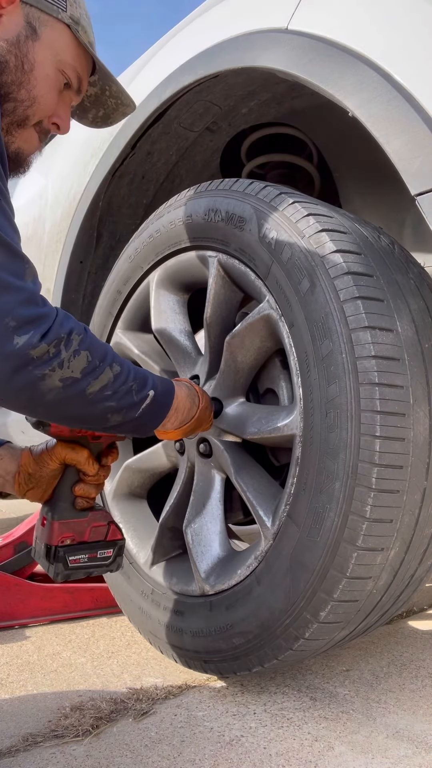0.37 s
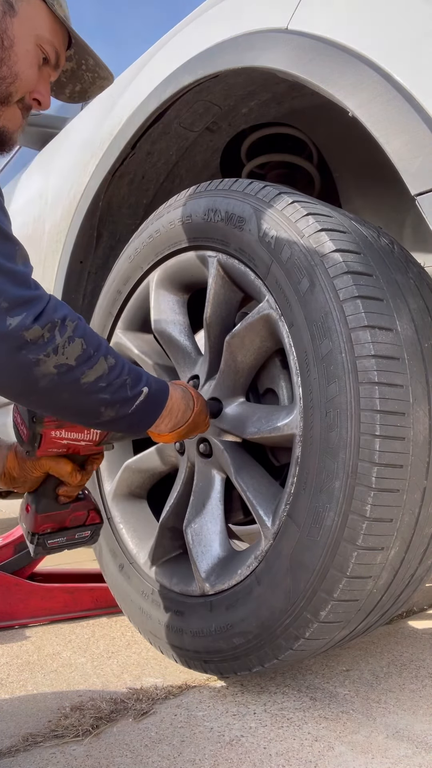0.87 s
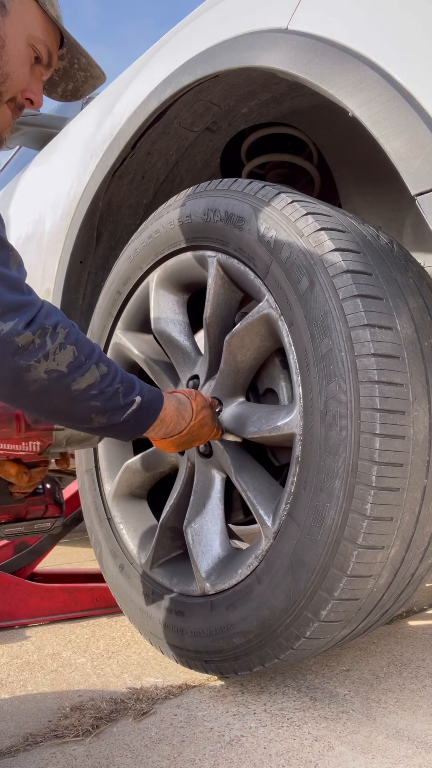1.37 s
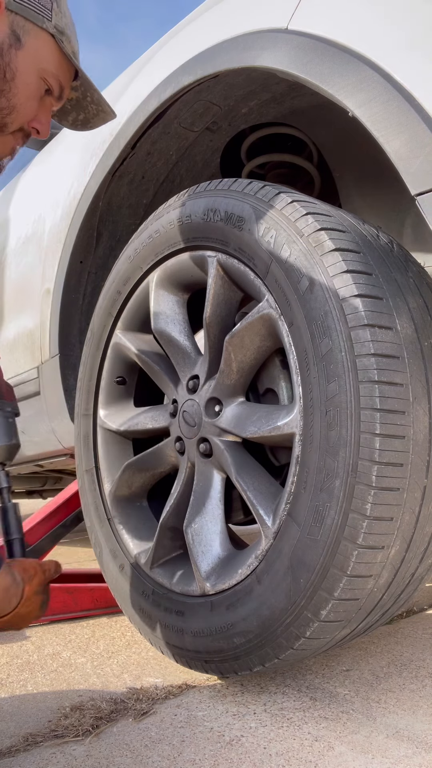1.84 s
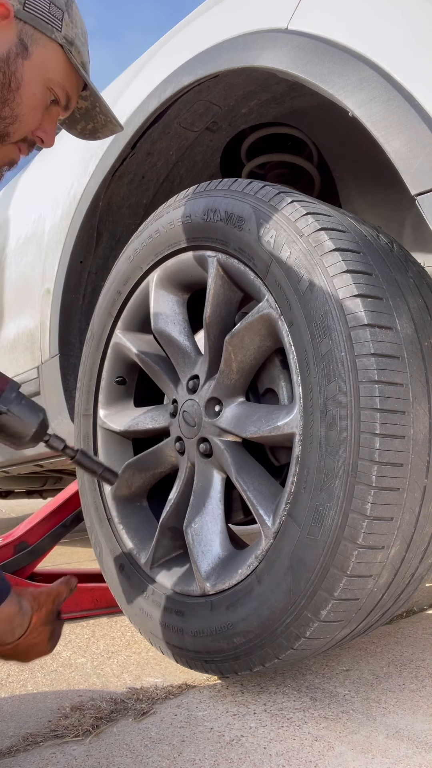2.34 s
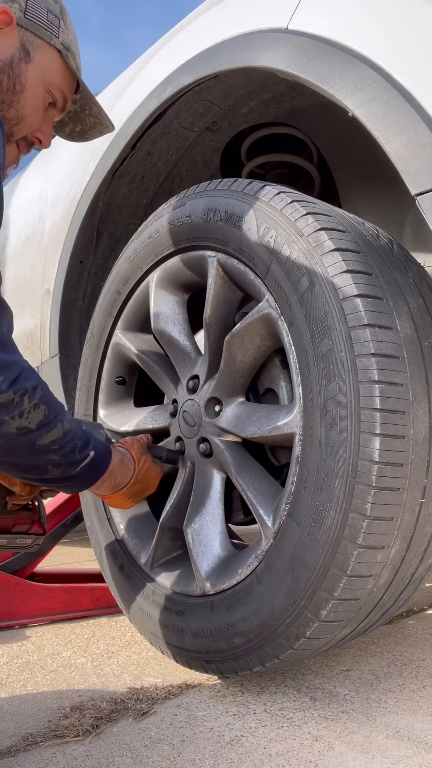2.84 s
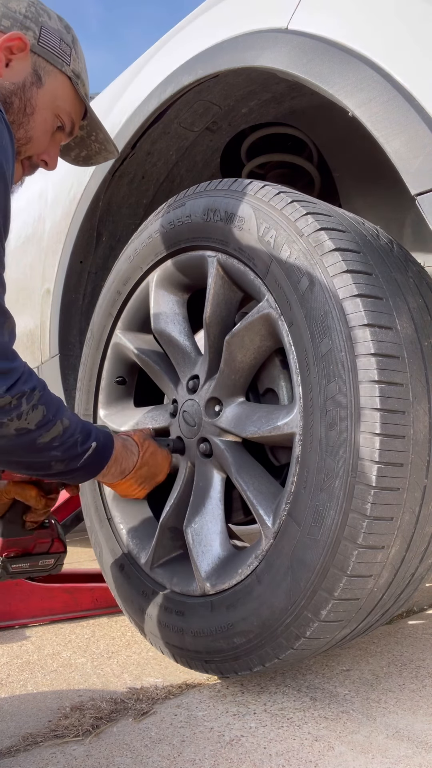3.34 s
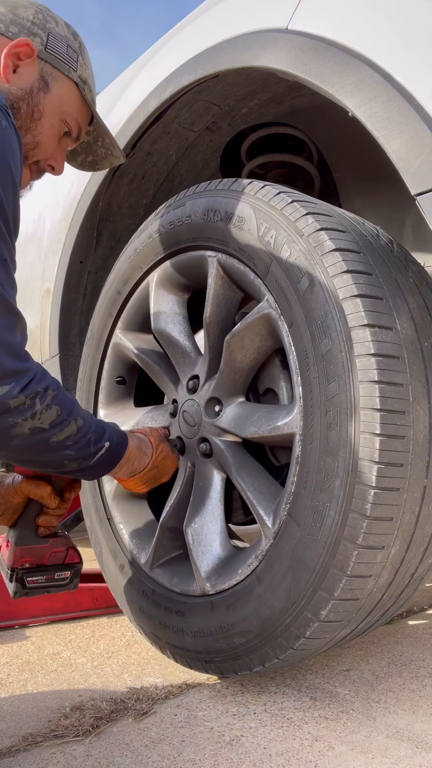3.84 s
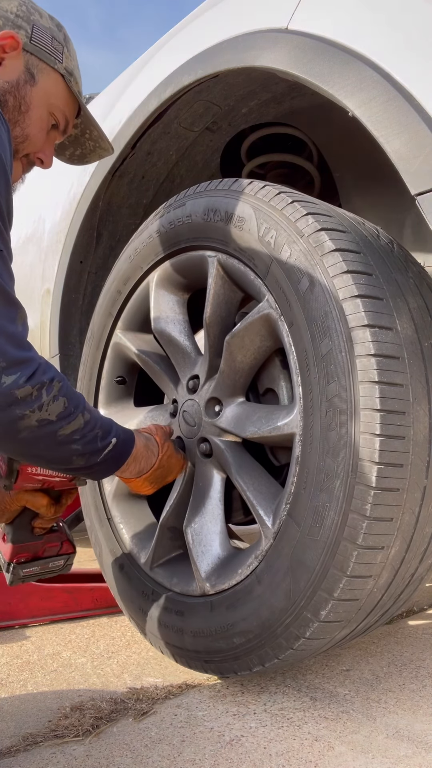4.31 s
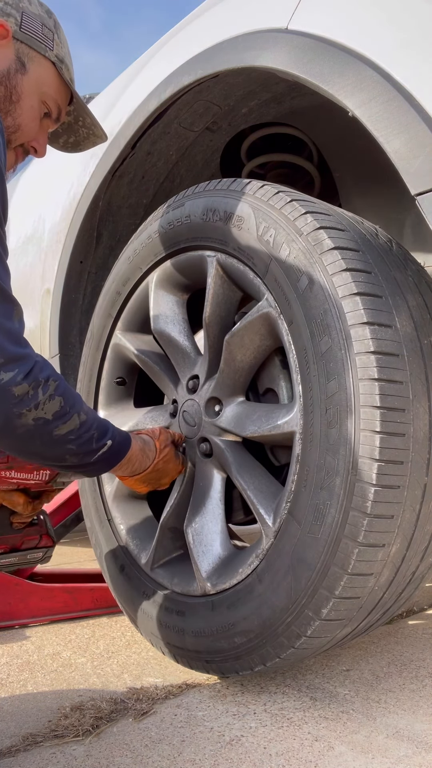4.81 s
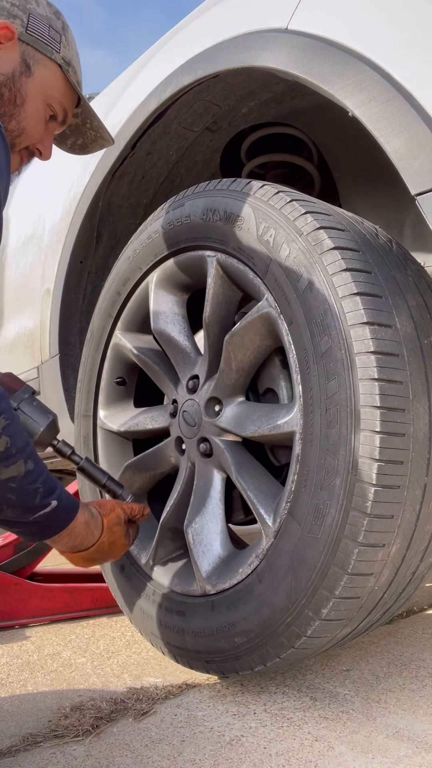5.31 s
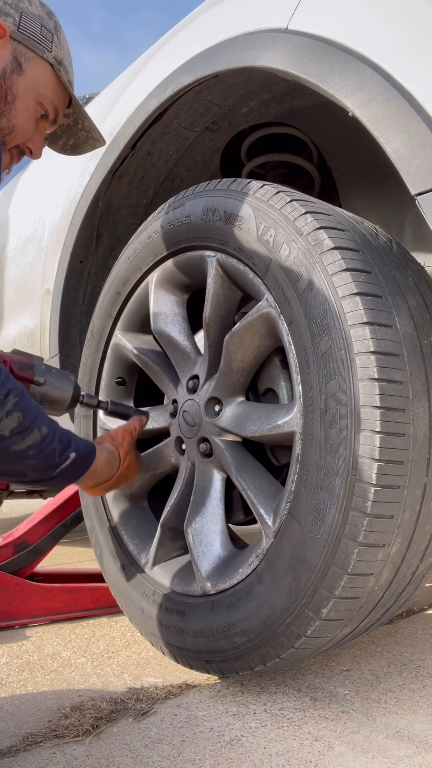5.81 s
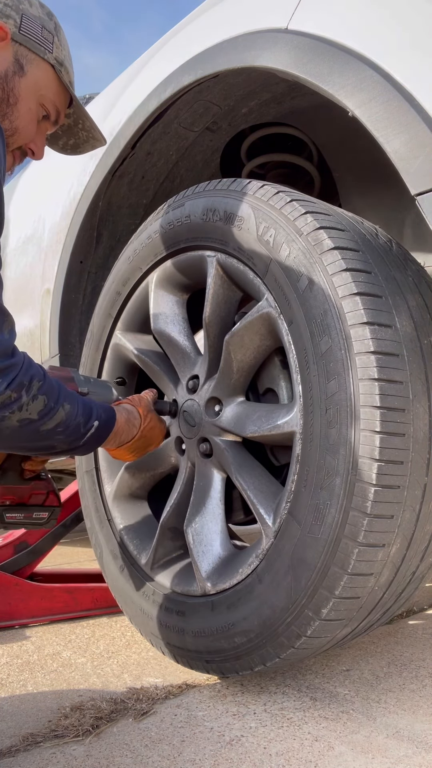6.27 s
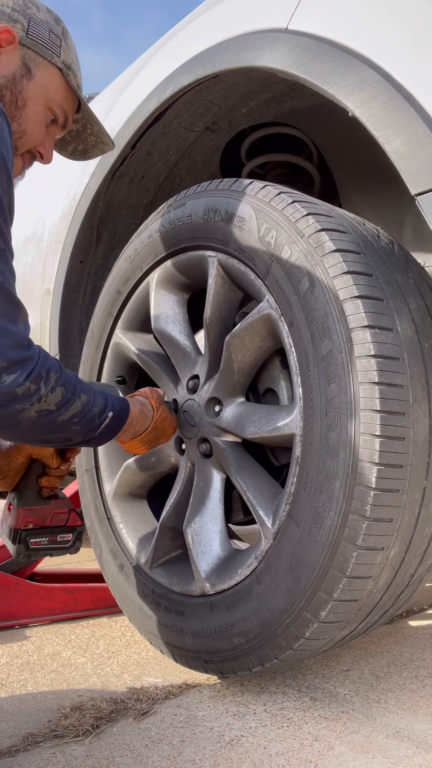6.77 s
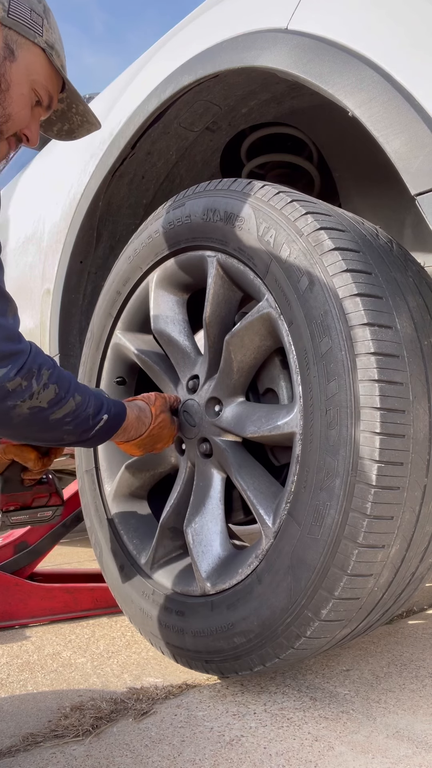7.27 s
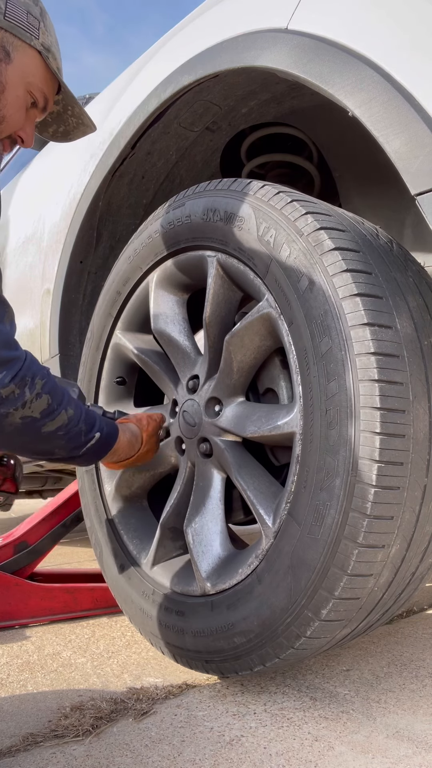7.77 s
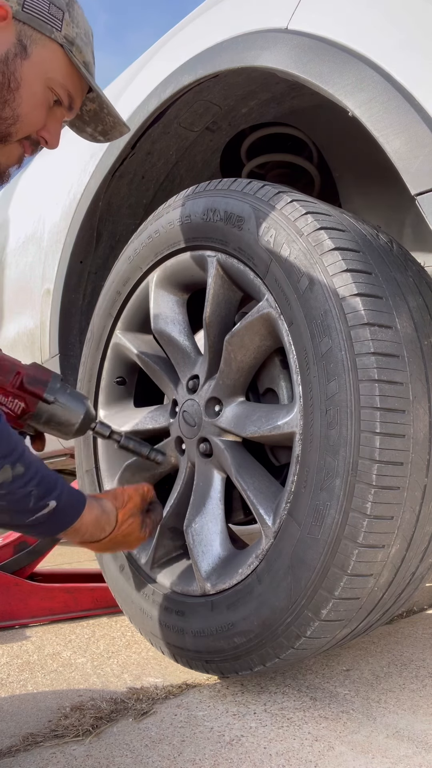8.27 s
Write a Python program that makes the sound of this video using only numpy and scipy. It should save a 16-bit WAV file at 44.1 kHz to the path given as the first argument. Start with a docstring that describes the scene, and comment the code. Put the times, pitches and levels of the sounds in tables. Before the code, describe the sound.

A cordless impact wrench hammers loose three wheel nuts in turn outdoors, each burst followed by a whirring free spin and quick braking stop.

```python
"""A cordless impact wrench undoes three wheel nuts outdoors, a step from a phone with two microphone ports.
Hammer blows, some 36 a second, are grainy noise bursts with ringing steel and a hum of the tyre's air. Motor
tones are multiples of one shaft's turning, through wind-up, free run and brake; filtered noise is fan, gears,
housing and the rattling nut, falling sweeps are low whoomps. Socket, nut and wheel clink as bursts and modes;
behind them shaped noise gives distant traffic and wind, gloves and a dragged socket, with a far thin tone."""
import sys
import numpy as np
from scipy import signal
from scipy.fft import rfft, irfft, next_fast_len
from scipy.io import wavfile
from scipy.ndimage import uniform_filter1d

SR = 44100
rng = np.random.default_rng(int(sys.argv[2]) if len(sys.argv) > 2 else 0)


def linear_from_db(decibels):
    """Turn decibels (scalar or array-like) into linear amplitude factors; 0 gives 1."""
    return 10 ** (np.asarray(decibels, float) / 20)


def output_pcm(signal):
    """Save a mono or channel-first signal as 16-bit PCM at the path in sys.argv[1].

    Samples are clipped to [-1, 1] before scaling.
    """
    pcm = np.clip(np.atleast_2d(signal).T, -1, 1) * 32767
    wavfile.write(sys.argv[1], SR, np.round(pcm).astype(np.int16))


N = 380583
T = np.arange(N) / SR

# Distant traffic and wind. Each row: time in seconds, level in dB.
RUMBLE_LEVEL = [(0.0, -65.5), (1.58, -72), (2.31, -71), (2.52, -65), (2.91, -62), (3.75, -61.5),
                (4.93, -69), (5.79, -65), (6.49, -58), (7.3, -58.5), (7.79, -64.5), (8.63, -65)]
# Its spectrum. Each row: frequency in Hz, relative density in dB per Hz.
RUMBLE_SPECTRUM = [(18, -36.5), (30, -12.5), (75, 4), (144, 0), (297, -8.5), (562, -11), (805, -19),
                   (903, -21.5), (1170, -37.5), (1500, -31), (1950, -59.5), (3300, -120)]
# Bass swelling under the hammering. Each row: peak in seconds, level in dB, fade in dB per second.
SHUDDERS = [(0.1, -33.5, 43.5), (0.24, -37, 46), (3.85, -51.5, 30.5), (4.02, -50.5, 33.5), (6.69, -35, 206),
            (6.751, -52, 42)]
SHUDDER_RISE_DB_S = 199.5
# A faint rising tone far off. Each row: time in seconds, frequency in Hz, level in dB.
FAR_WHINE = [(1.6, 1440, -100), (1.8, 1460, -101.5), (2.8, 1568, -81), (3.101, 1590, -100)]
# Gloves and sleeves close by. Each row: peak in seconds, level in dB, spread in seconds.
RUSTLES = [(1.5, -83.5, .25), (2.3, -87, 0.14), (2.62, -76, 0.14), (3.35, -81, .17), (5.17, -76.5, .15),
           (6.28, -77, .12), (7.86, -86.5, .2), (8.63, -80.5, .08)]
RUSTLE_FLOOR_DB = -88.5
# Spectrum of the cloth. Each row: frequency in Hz, relative density in dB per Hz.
CLOTH_SPECTRUM = [(700, -3.5), (1500, -1.5), (3000, -4), (5000, -9), (8000, -10), (12000, -9.5),
                  (15800, -10)]
# Socket dragged over the wheel. Each row: start in seconds, length in seconds, level in dB.
RUBS = [(2.644, 0.44, -73.5), (3.111, 0.29, -67.5)]
# Spectrum of the drag. Each row: frequency in Hz, relative density in dB per Hz.
RUB_SPECTRUM = [(450, -12), (600, -2), (750, -13), (1500, -11), (1750, -3), (1850, 8), (1950, -10),
                (2300, -27), (3000, -29), (3600, -17), (4300, -38)]

# Socket, nut and wheel touch. Each row: start in seconds, relative level in dB, treble tilt in dB per
# octave, scuff decay t60 in seconds.
CLINKS = [(1.5064, -31, -1, 0.067), (1.975, -52, -8, 0.067), (2.2662, -55, -5, 0.071),
          (2.4819, -52, 8, 0.084), (2.6104, -50, -7, 0.055), (2.6412, -32, -5.5, 0.038),
          (3.0488, -60, -0.5, 0.04), (3.1016, -24, -9, 0.019), (3.2037, -29.5, -6, 0.032),
          (3.286, -40.5, -9.5, 0.053), (3.3363, -58, -11, 0.052), (3.358, -35.5, -10, 0.049),
          (3.422, -48.5, -7.5, 0.093), (3.437, -47, -4, 0.05), (5.098, -33, 0.5, 0.052),
          (5.1485, -33, -2, 0.039), (5.6374, -48, -4, 0.058), (5.6573, -51, -7, 0.065),
          (5.9364, -39, -12, 0.12), (5.942, -26.5, -8.5, 0.068), (5.9492, -19.5, -8, 0.037),
          (6.15, -52, -19, 0.05), (6.1937, -40.5, -7, 0.22), (6.2253, -27, -6.5, 0.083),
          (6.2822, -30, -4, 0.036), (6.3795, -28, -7.5, 0.051), (6.439, -52, 5.5, 0.06),
          (6.4958, -29, -1.5, 0.066), (7.878, -33.5, -3, 0.042), (8.02, -52, -4.5, 0.056),
          (8.088, -58, -4, 0.04), (8.1333, -33, 0.5, 0.066), (8.1566, -63, -10, 0.06),
          (8.207, -50.5, 0, 0.054), (8.289, -62, -3, 0.038), (8.4585, -40, -8, 0.1),
          (8.4732, -25, -7, 0.026), (8.5023, -38.5, -7, 0.07)]
# Modes of the wheel. Each row: nominal frequency in Hz, relative level in dB, t60 in seconds.
WHEEL_MODES = [(646, -9, .5), (883, -7, .14), (991, -4, .15), (1250, -5, .06), (1350, -4, .12),
               (1464, -9, .28), (1660, -4, .05), (1836, -11, .4), (2040, -3, .16), (2250, -5, .05),
               (2482, -17, .15), (2800, -6, .05), (3650, -22, .3)]
WHEEL_RING_DB = -33.5
# The socket's thin ring. Each row: start in seconds, low tone in dB, high tone in dB, factor on the decay t60.
SOCKET_RINGS = [(1.973, -64, -63.5, 1.33), (2.641, -57, -45, 0.15), (3.204, -85, -73, .6),
                (5.099, -60, -76, 0.83), (5.949, -83, -72.5, 0.43), (6.205, -85, -51, 0.17),
                (8.021, -68.5, -52, 0.99), (8.134, -80, -63, 0.37)]
# Low socket tone. Each row: nominal frequency in Hz, relative level in dB, t60 in seconds ahead of the factor.
SOCKET_LOW = [(9790, 0, .55), (9717, -10, .3)]
# High socket tone. Each row: nominal frequency in Hz, relative level in dB, t60 in seconds ahead of the factor.
SOCKET_HIGH = [(12620, 0, .55), (12520, -10, .25)]

# Low whoomps. Each row: start in seconds, relative level in dB, fade in seconds, sharpness of the start.
WHOOMPS = [(0.045, -26, .04, 1), (0.077, -15.5, .02, 1), (.155, -23.5, .015, 1), (0.2798, -17, 0.028, 0.95),
           (0.308, -19.5, 0.02, 0.8), (0.338, -15.5, 0.045, 0.4), (.44, -31.5, 0.025, 0.2),
           (0.484, -33, .03, 0.3), (0.561, -5, 0.016, 1.2), (.66, -28, 0.026, 0.02),
           (0.707, -31, 0.03, 0.16), (3.80, -34.5, 0.066, 0.19), (3.862, -14, 0.041, .6),
           (3.8931, -10, 0.033, 0.45), (4.006, -14.5, 0.025, 0.57), (4.063, -27.5, 0.052, .2),
           (6.668, -25, 0.017, 0.54), (6.836, -27.5, 0.015, 0.64), (6.967, -34, 0.038, 0.07)]

# Free spinning up to the brake, one list a run. Each row: time in seconds, gear mesh in Hz, relative level
# in dB of its 1st harmonic, of its 2nd, and of the fan and gearbox noise.
SPIN_RUNS = [
    [(0.575, 3400, -70, -69.5, -46.5), (0.605, 3483, -47.5, -62, -41.5), (0.623, 3790, -42.5, -59, -41),
     (0.647, 3687, -39.5, -63, -37.5), (0.827, 3905, -41, -35, -36), (1.045, 3923, -54.5, -34.5, -39),
     (1.249, 3979, -41.5, -36.5, -41), (1.312, 3770, -50, -42.5, -36.5)],
    [(4.14, 3600, -59, -84, -43), (4.25, 3852, -44, -48.5, -39.5), (4.416, 3953, -41.5, -39, -41.5),
     (4.714, 3971, -48, -37, -41.5), (4.878, 3996, -44.5, -37.5, -40.5), (4.956, 3785, -53, -50, -38.5)],
    [(6.85, 3700, -71, -75, -43.5), (6.906, 3753, -49, -51, -38.5), (6.98, 3816, -44, -40, -39),
     (7.19, 3950, -40, -65, -41.5), (7.406, 3980, -37.5, -40.5, -43), (7.598, 3980, -40.5, -35.5, -39.5),
     (7.69, 3800, -70, -52, -38.5)],
]
PINION_TEETH = 13
# 3rd mesh harmonic in free running, on the scale of SPIN_RUNS: least level, and level against the 2nd
THIRD_DB, THIRD_BELOW_DB = -58, -13
# Pole hum of the motor. Each row: multiple of shaft rate, relative level in dB.
POLE_ORDERS = [(4, -8), (5, -12), (8, 0), (12, -17), (20, -14), (36, -3)]
HUM_DB, HUM_RISE_DB_S, HUM_TOP_DB = -63.5, 24.5, -50  # pole hum grows as the nut runs out
# Housing resonances. Each row: frequency in Hz, width in Hz, lift in dB.
HOUSING = [(2720, 290, 18), (2125, 55, 6.5)]
# Motor tones under the brake. Each row: multiple of shaft rate, relative level in dB.
BRAKE_ORDERS = [(4, -49.5), (8, -47.5), (13, -53), (16, -52.5), (19, -50), (22, -57)]
# Nut rattle, release tone, brake glides and stop growl. Each entry: relative level in dB for one run.
RUN_DB = [0, -3.5, -3]
# Mesh rate falls gently during the bite, then faster
BITE_HZ_S, BITE_S, BRAKE_HZ_S, BRAKE_S = 11520, .035, 17800, .15
BRAKE_FADE_DB_S, BRAKE_WOBBLE = 397, .012
BRAKE_FLUTTER_DB = 8  # random level flutter breaks up the glides
BITE_ORDER, BITE_DB, BITE_FADE = 8, -38.5, 0.23  # fade as a share of the braking
RELEASE_S, RELEASE_ORDER, RELEASE_DB = 0.051, 9.94, -48.5  # trigger let go ahead of the brake

# Spectrum of fan and gears. Each row: frequency in Hz, relative density in dB per Hz.
GEAR_SPECTRUM = [(150, -23), (400, -11.5), (800, -7), (1300, -1.5), (1900, 0), (2500, -1.5), (3300, -6),
                 (4300, -8.5), (5500, -5), (7000, -9), (9000, -12), (11000, -12.5), (14000, -15),
                 (16300, -22)]
# Motor under load while hammering. Each row: start in seconds, end in seconds.
HAMMERING = [(0.0, 0.572), (3.9, 4.18), (6.648, 6.88)]
LOAD_DB, LOAD_TREBLE_DB = -38, -48
TREBLE_SAG_DB_S, TREBLE_RISE_S = 8, .04
WHIR_SPEED_POWER, TREBLE_SPEED_POWER, COAST_DB_S = 3.9, 2.3, 450.5
# Motor winds up against the hammer spring. Each row: start in seconds, first catch in seconds, level in dB
# at the catch of gear noise, of housing growl and of controller whine.
WIND_UPS = [(-0.06, 0.033, -25.5, -28.5, -34), (0.031, 0.14, -27, -29.5, -40.5),
            (3.735, 3.834, -20.5, -26, -50.5), (6.478, 6.58, -22.5, -35, -48.5)]
WIND_GEAR_RISE_DB, WIND_GROWL_RISE_DB, WIND_WHINE_RISE_DB, WIND_FADE_DB_S = 63.5, 31, 8, 700.5
WHINE_HZ = 7700
# Spectrum of the growling housing. Each row: frequency in Hz, relative density in dB per Hz.
GROWL_SPECTRUM = [(2200, -23), (2550, -3), (2700, 1), (2850, -7.5), (3200, -19.5)]
STOP_GROWL_DB, STOP_FADE_DB_S = -61.5, 130  # the housing rings on after the stop
# Rattle of the nut running along the stud thread. Each row: frequency in Hz, relative density in dB per Hz.
DRONE_SPECTRUM = [(1050, -28), (1200, -1.5), (1450, 0), (1650, -10)]
DRONE_DB, DRONE_RISE_S = -43.5, 0.076

# Hammer on anvil. Each row: start in seconds, relative level in dB, rattle decay t60 in seconds.
BLOWS = [(0.0302, 1.5, 0.035), (0.0726, -22, 0.071), (0.1076, -25, 0.057), (0.142, -9, 0.024),
         (0.1519, 1, 0.048), (0.179, -0.5, 0.04), (0.191, -6.5, 0.064), (0.2464, 0, 0.037),
         (0.271, -3.5, 0.049), (0.278, -7, 0.056), (0.3091, 2.5, 0.021), (0.337, -0.5, 0.034),
         (0.3646, -1, 0.031), (0.393, 0.5, 0.03), (0.4209, 0, 0.023), (0.4472, -3, 0.04),
         (0.4748, -6, 0.044), (0.5016, 0.5, 0.022), (0.5307, -3.5, 0.034), (0.5584, -6, 0.014),
         (0.609, -30, 0.06), (3.7547, -40.5, 0.05), (3.7778, -23, 0.042), (3.798, -23, 0.017),
         (3.8101, -16.5, 0.05), (3.8192, -1.5, 0.046), (3.8321, -4.5, 0.079), (3.862, -1.5, 0.073),
         (3.8923, -2, 0.035), (3.9223, 1, 0.021), (3.9505, -2.5, 0.035), (3.9783, 1.5, 0.019),
         (4.0051, -7, 0.081), (4.0326, -1.5, 0.032), (4.0601, -2.5, 0.042), (4.0875, -5.5, 0.047),
         (4.1169, -3.5, 0.035), (4.1946, -12.5, 0.022), (4.2379, -15.5, 0.08), (6.535, -19.5, 0.067),
         (6.568, -8.5, 0.028), (6.5775, -7.5, 0.1), (6.6066, -5, 0.094), (6.6372, 2.5, 0.024),
         (6.6654, 1.5, 0.023), (6.6935, -11, 0.18), (6.7206, -4, 0.05), (6.747, -10, 0.11),
         (6.7747, 0, 0.028), (6.8027, -6.5, 0.076), (6.8323, -1.5, 0.026), (6.8692, -12.5, 0.056),
         (6.9158, -16, 0.043)]
# Spectrum of rattles and scuffs ahead of tilt. Each row: frequency in Hz, relative density in dB per Hz.
BLOW_SPECTRUM = [(150, -12.5), (400, -6.5), (800, -15.5), (1300, -3.5), (2000, 0.5), (3200, -4),
                 (4200, -2.5), (5500, 7), (7000, 0), (9000, -2.5), (11000, -4.5), (14000, -4),
                 (16500, -15.5)]
GRAIN_DB, COLOUR_SCATTER_DB, TILT_DB, TILT_SCATTER_DB = 3.5, 3.2, 0.15, 2  # tilt is per octave
# Modes of the anvil. Each row: nominal frequency in Hz, relative level in dB, t60 in seconds.
ANVIL_MODES = [(1366, -13, 0.082), (1916, -13.5, 0.039), (2070, -19.5, 0.014), (2650, -5.5, 0.051),
               (3215, 4, 0.019), (3890, 3.5, 0.026), (6060, -0.5, 0.075), (6100, -8.5, 0.038),
               (7570, -9.5, 0.021), (13500, -8.5, .02)]
ANVIL_SCATTER_DB = 4
# Modes of its tip. Each row: nominal frequency in Hz, relative level in dB, t60 in seconds.
TIP_MODES = [(9800, -1.5, 0.075), (9400, -3, .04)]
TIP_DB, TIP_SCATTER_DB, TIP_GAIN_DB_S = -33, 4, 2.45  # the tip rings more from nut to nut
TYRE_AIR_HZ, TYRE_AIR_DB, TYRE_AIR_T60_S = 187.2, -64.5, 2.4

# Phase between the microphone ports. Each row: frequency in Hz, lead of the left port in radians.
PORT_LEAD = [(0, 0), (2240, .15), (2600, .5), (3100, .15), (4050, .2), (4400, .8), (4750, 2.9), (5450, 3.5),
             (5800, 3.9), (7240, 4.1), (9900, 5.2), (10600, 5.8), (11900, 6.1), (16500, 6.4)]
LEFT_DB = .2  # left port up, right port down by this much
ECHO_DB, ECHO_SIDE_DB, ECHO_T60_S = -12.5, -12, 0.065
TOP_HZ = 16500


def unit(x):
    """Scale to rms 1."""
    return x / np.sqrt(np.mean(x ** 2))


def colour(x, points):
    """Shape a spectrum by (Hz, dB) points; it falls away outside them."""
    hz, db = np.transpose(points)
    size = next_fast_len(x.shape[-1])
    f = np.fft.rfftfreq(size, 1 / SR) + 1
    edge = np.minimum(f / hz[0], 1) ** 2 * np.minimum(hz[-1] / f, 1) ** 2
    gain = linear_from_db(np.interp(np.log(f), np.log(hz), db)) * edge
    return irfft(rfft(x, size) * gain, size)[..., :x.shape[-1]]


def shaped_noise(points):
    """Steady noise of rms 1 with the given spectrum."""
    return unit(colour(rng.standard_normal(N), points))


def curves(tables, off):
    """Columns over time; between the tables they rest at the value off."""
    rows = []
    for table in tables:
        rows += [(table[0][0] - .004, *off), *table, (table[-1][0] + .004, *off)]
    s, *columns = np.transpose(rows)
    return [np.interp(T, s, column) for column in columns]


def walk(rate):
    """Random levels held 1 / rate s and slewed; spread near 1."""
    k = int(SR / rate)
    held = np.repeat(rng.standard_normal(N // k + 1), k)
    return 0.95 * uniform_filter1d(uniform_filter1d(held, k), k)[:N]


def peak(s, db, rise_db_s, fall_db_s):
    """A level that climbs to db at time s and sinks after it."""
    return db - np.where(T < s, rise_db_s * (s - T), fall_db_s * (T - s))


def add(out, s, sound):
    """Mix a sound in at time s."""
    i = int(s * SR)
    out[i:i + len(sound)] += sound[:N - i]


def sine(hz):
    """A tone that follows a frequency over time."""
    return np.sin(2 * np.pi * np.cumsum(hz) / SR)


def ring(modes, t, scatter_db, detune):
    """Decaying modes; each contact point excites them differently."""
    hz, db, t60 = np.transpose(modes)[:, :, None]
    level, pitch, phase = rng.standard_normal((3, len(modes), 1))
    decay = linear_from_db(db + scatter_db * level - 60 * t / t60)
    return np.sum(decay * np.sin(2 * np.pi * hz * (1 + detune * pitch) * t + phase), 0)


def burst(t, tilt_db, t60, rise_s, grain_db):
    """Many parts rattle at once: grainy noise with a crack near the front, each with its own colour."""
    points = []
    for hz, db in BLOW_SPECTRUM:
        tilt = tilt_db * np.log2(max(hz, 800) / 4000)
        points.append((hz, db + tilt + COLOUR_SCATTER_DB * rng.standard_normal()))
    noise = rng.standard_normal(len(t))
    grain = np.repeat(rng.standard_normal(len(t) // 24 + 1), 24)[:len(t)]
    rattle = unit(colour(noise * linear_from_db(grain_db * grain), points))
    crack = 1 + 1.5 * np.exp(-t / 0.0031)
    rise = 1 - np.exp(-(t / rise_s) ** 2)
    return rattle * rise * crack * linear_from_db(-60 * t / np.clip(t60, .008, .3))


def rumble():
    """Distant traffic and wind: wavering low noise, with the bass swelling under the hammering."""
    s, db = np.transpose(RUMBLE_LEVEL)
    gain = linear_from_db(np.interp(T, s, db))
    for s, db, fade in SHUDDERS:
        gain += linear_from_db(peak(s, db, SHUDDER_RISE_DB_S, fade))
    return gain * linear_from_db(1.9 * walk(9)) * shaped_noise(RUMBLE_SPECTRUM)


def far_whine():
    """A faint tone far off, gliding upward."""
    s, hz, db = np.transpose(FAR_WHINE)
    return linear_from_db(np.interp(T, s, db)) * sine(np.interp(T, s, hz))


def rustle():
    """Gloves and sleeves: fluttering cloth noise that swells over a faint floor."""
    gain = linear_from_db(RUSTLE_FLOOR_DB)
    for s, db, spread in RUSTLES:
        gain = gain + linear_from_db(db) * np.exp(-((T - s) / spread) ** 2)
    return gain * linear_from_db(3.7 * walk(45) + 2.4 * walk(9)) * shaped_noise(CLOTH_SPECTRUM)


def rub():
    """The socket dragged over the wheel: uneven friction noise that dwindles."""
    gain = np.zeros(N)
    for s, length, db in RUBS:
        gain += linear_from_db(db) * np.sqrt(np.clip(1 - (T - s) / length, 0, 1)) * (T > s)
    return gain * linear_from_db(3 * walk(40)) * shaped_noise(RUB_SPECTRUM)


def clinks():
    """Light touches: a dry scuff with a faint ring of the wheel."""
    out, t = np.zeros(N), T[:int(.4 * SR)]
    for s, db, tilt_db, t60 in CLINKS:
        # the wheel's ring flutters randomly in level
        flutter_db = 6 * np.repeat(rng.standard_normal(len(t) // 200 + 1), 200)[:len(t)]
        rim = ring(WHEEL_MODES, t, 3, .004) * linear_from_db(uniform_filter1d(flutter_db, 150))
        scuff = burst(t, tilt_db, t60, 0.0016, GRAIN_DB)
        add(out, s, linear_from_db(db - 14) * scuff + linear_from_db(db + WHEEL_RING_DB) * rim)
        # the wheel arch holds a duller, longer wash
        add(out, s, linear_from_db(db - 33) * burst(t, tilt_db - 5.5, 0.2, 0.0044, 2))
    return out


def socket_rings():
    """The socket's thin ring: two pairs of close decaying modes, each ring with its own decay."""
    out, t = np.zeros(N), T[:int(.6 * SR)]
    for s, low_db, high_db, factor in SOCKET_RINGS:
        low = [(hz, db, t60 * factor) for hz, db, t60 in SOCKET_LOW]
        high = [(hz, db, t60 * factor) for hz, db, t60 in SOCKET_HIGH]
        add(out, s, linear_from_db(low_db) * ring(low, t, 0.88, 0.0013) + linear_from_db(high_db) * ring(high, t, 0.84, .001))
    return out


def whoomps():
    """The pitch falls fast from the treble and settles in the deep bass."""
    out, t = np.zeros(N), T[:int(.2 * SR)]
    sweep = np.sin(2 * np.pi * (0.77 * np.log2(t / 0.00055 + .3) + 24 * t))
    for s, db, fade_s, sharp in WHOOMPS:
        rise = 1 - np.exp(-t * abs(sharp) / 0.002)
        add(out, s, linear_from_db(db) * sweep * np.exp(-(t / fade_s) ** 1.2) * rise)
    return out


def controls():
    """Speed and levels of the free runs; after each the brake bites, then pulls the speed down steadily."""
    bite_drop_hz = BITE_HZ_S * BITE_S
    stop_drop_hz = bite_drop_hz + BRAKE_HZ_S * (BRAKE_S - BITE_S)
    tables = []
    for run, run_db in zip(SPIN_RUNS, RUN_DB):
        start = run[0][0]
        s, hz, first_db, second_db, whir_db = run[-1]
        rows = [(*row, row[0] - start, row[0] - s, run_db) for row in run]
        for late, drop_hz in (BITE_S, bite_drop_hz), (BRAKE_S, stop_drop_hz):
            fade_db = BRAKE_FADE_DB_S * late
            rows.append((s + late, hz - drop_hz, first_db - fade_db, second_db - fade_db, whir_db,
                         s - start, late, run_db))
        tables.append(rows)
    return curves(tables, (1201, -120, -120, -120, 0, 0, -120))


def wind_up():
    """Levels of whine, growl and gear noise as the motor winds up; the growl returns at each stop."""
    whine, growl, gears = np.zeros((3, N))
    for s, catch, gear_db, growl_db, whine_db in WIND_UPS:
        def ramp(db, rise_db):
            level_db = peak(catch, db, rise_db / (catch - s), WIND_FADE_DB_S)
            return linear_from_db(level_db) * np.clip((T - s) / .015, 0, 1)
        whine += ramp(whine_db, WIND_WHINE_RISE_DB)
        growl += ramp(growl_db, WIND_GROWL_RISE_DB)
        gears += ramp(gear_db, WIND_GEAR_RISE_DB)
    for run, run_db in zip(SPIN_RUNS, RUN_DB):
        growl += linear_from_db(peak(run[-1][0] + BRAKE_S, STOP_GROWL_DB + run_db, WIND_FADE_DB_S, STOP_FADE_DB_S))
    return whine, growl, gears


def coast(gain):
    """Smooth a gain so that the sound lingers and dies away after the stop."""
    keep = linear_from_db(-COAST_DB_S / SR)
    return signal.lfilter([1 - keep], [1, -keep], gain)


def controller_whine(gain):
    """A thin high tone of the controller, unsteady in pitch and level."""
    return gain * linear_from_db(2.9 * walk(270)) * sine(WHINE_HZ * (1 + 0.0078 * walk(200)))


def housing_noise(growl_gain, free, free_s, run_db):
    """Resonant noise: the housing growls at wind-up and stop, and the nut rattles along the thread while the
    shaft spins."""
    rise = free * np.clip(free_s / DRONE_RISE_S - 1, 0, 1)
    drone_gain = coast(rise * linear_from_db(DRONE_DB + 2.54 * run_db + 4.03 * walk(30)))
    return growl_gain * shaped_noise(GROWL_SPECTRUM) + drone_gain * shaped_noise(DRONE_SPECTRUM)


def fan_and_gears(start_gain, speed, whir_db, free_s):
    """Noise of fan and gears in two bands that follow speed, load and wind-up."""
    load = sum(1. * (T >= a) * (T < b) for a, b in HAMMERING)
    load = uniform_filter1d(load, 400, mode="nearest")
    low_gain = coast(linear_from_db(whir_db) * speed ** WHIR_SPEED_POWER) + load * linear_from_db(LOAD_DB)
    top_gain = linear_from_db(whir_db - TREBLE_SAG_DB_S * free_s) * speed ** TREBLE_SPEED_POWER
    top_gain = coast(top_gain * (1 - np.exp(-free_s / TREBLE_RISE_S))) + load * linear_from_db(LOAD_TREBLE_DB)
    # uneven clatter: quick grains in the noise
    noise = colour(rng.standard_normal(N) * linear_from_db(2.3 * walk(500)), GEAR_SPECTRUM)
    low = signal.sosfilt(signal.butter(4, 5000, fs=SR, output="sos"), noise)
    top = signal.sosfilt(signal.butter(4, 5000, "high", fs=SR, output="sos"), noise)
    top_flicker = linear_from_db(1.3 * walk(21) + 2.4 * walk(150))
    return low_gain * unit(low) + start_gain * unit(noise) + top_gain * top_flicker * unit(top)


def gear_mesh(turn, first_db, second_db, free):
    """Three harmonics of the pinion's tooth rate, each fluttering in level."""
    third_db = np.where(free, np.maximum(THIRD_DB, second_db + THIRD_BELOW_DB), second_db)
    out = np.zeros(N)
    for k, db in enumerate((first_db, second_db, third_db), 1):
        out += linear_from_db(db + 4 + 2 * walk(60)) * np.sin(k * PINION_TEETH * turn)
    return out


def orders(table, turn, shaft_hz, flutter_db=1.5):
    """Multiples of the shaft rate; an order swells as it sweeps through a housing resonance."""
    out = np.zeros(N)
    for k, db in table:
        lift = 1
        for hz, width, peak_db in HOUSING:
            lift = lift + linear_from_db(peak_db) / (1 + (2 * (k * shaft_hz - hz) / width) ** 2)
        out += linear_from_db(db + flutter_db * walk(70)) * lift * np.sin(k * turn)
    return out


def motor_hum(turn, shaft_hz, speed, free, free_s, brake_s, braked, run_db):
    """Pole hum grows, jumps to another order as the trigger is let go, barks at the bite and glides down."""
    released = uniform_filter1d(free * (brake_s > -RELEASE_S) * 1., 200)
    hum_db = np.minimum(HUM_DB + HUM_RISE_DB_S * free_s, HUM_TOP_DB)
    hum_gain = (free - released) * np.minimum(free_s / .15, 1) * linear_from_db(hum_db)
    release_gain = released * linear_from_db(2 * run_db)
    braking = np.clip(braked * 20, 0, 1) * np.clip((1 - braked) * 6, 0, 1) * linear_from_db(run_db)
    bite_gain = braking * linear_from_db(run_db) * np.exp(-(braked / BITE_FADE) ** 2)
    hum = hum_gain * orders(POLE_ORDERS, turn, shaft_hz)
    release = release_gain * orders([(RELEASE_ORDER, RELEASE_DB)], turn, shaft_hz)
    bite = bite_gain * orders([(BITE_ORDER, BITE_DB)], turn, shaft_hz)
    glide = braking * speed ** 0.94 * orders(BRAKE_ORDERS, turn, shaft_hz, BRAKE_FLUTTER_DB)
    return hum + release + bite + glide


def motor():
    """One wavering shaft drives gear mesh and pole hum; fan, gear and housing noise and whine join in."""
    mesh_hz, first_db, second_db, whir_db, free_s, brake_s, run_db = controls()
    braked = np.maximum(brake_s, 0) / BRAKE_S  # share of the braking done
    free = (free_s > 0) & (braked == 0)
    speed = mesh_hz / mesh_hz.max()
    shaft_hz = mesh_hz / PINION_TEETH
    wobble = 0.0017 * walk(80) + BRAKE_WOBBLE * (braked > 0) * walk(400)
    turn = 2 * np.pi * np.cumsum(shaft_hz * (1 + wobble)) / SR
    whine_gain, growl_gain, start_gain = wind_up()
    tones = gear_mesh(turn, first_db, second_db, free)
    tones += motor_hum(turn, shaft_hz, speed, free, free_s, brake_s, braked, run_db)
    noise = fan_and_gears(start_gain, speed, whir_db, free_s)
    noise += housing_noise(growl_gain, free, free_s, run_db)
    return tones + noise + controller_whine(whine_gain)


def tyre_air(kicks):
    """Each blow kicks the air in the tyre, which hums on and wavers."""
    pole = np.exp(-np.log(1000) / TYRE_AIR_T60_S / SR)
    level = signal.lfilter([1], [1, -pole], kicks)
    return level * linear_from_db(2 * walk(12)) * np.sin(2 * np.pi * TYRE_AIR_HZ * T)


def hammer():
    """Blows: rattle, briefly ringing steel, and the air in the tyre humming on."""
    out, kicks, t = np.zeros(N), np.zeros(N), T[:int(.12 * SR)]
    for s, db, t60 in BLOWS:
        tip_chance, tilt_chance = rng.standard_normal(2)
        tip_db = db + TIP_DB + TIP_GAIN_DB_S * s + TIP_SCATTER_DB * tip_chance
        steel = linear_from_db(db - 19.0) * ring(ANVIL_MODES, t, ANVIL_SCATTER_DB, 0.052)
        steel += linear_from_db(tip_db) * ring(TIP_MODES, t, 4.5, 0.0033)
        rattle = burst(t, TILT_DB + TILT_SCATTER_DB * tilt_chance, t60, 0.0012, GRAIN_DB)
        add(out, s, linear_from_db(db - 7.5) * rattle + steel * np.minimum(t / 0.0018, 1))
        add(kicks, s, linear_from_db([db + TYRE_AIR_DB]))
    return out + tyre_air(kicks)


def echo(near):
    """Ground and wheel arch return a short scattered echo, as a common part and one unlike at the ports."""
    t = T[:int(.15 * SR)]
    scatter = rng.standard_normal((2, len(t))) * linear_from_db(-60 * t / ECHO_T60_S) * (t > .002)
    scatter /= np.sqrt(np.sum(scatter ** 2, 1, keepdims=True))
    scatter = colour(scatter, [(300, -8.5), (1500, -3.5), (5000, -5.5), (12000, -4.5)])
    scatter[1] = colour(scatter[1], [(300, -1.5), (2000, -2), (5000, 5.5), (9000, 4), (13000, -5)])
    return signal.fftconvolve(near[None], scatter, axes=1)[:, :N]


def scene():
    """All sources meet at the phone; the left port leads in phase, and the echo differs at the ports."""
    near = rumble() + far_whine() + rustle() + rub() + clinks() + socket_rings() + whoomps() + motor() + hammer()
    mid, side = echo(near)
    size = next_fast_len(N)
    lead = np.interp(np.fft.rfftfreq(size, 1 / SR), *np.transpose(PORT_LEAD))
    sides = np.array([[1], [-1]])  # left, right
    spectrum = rfft(near + linear_from_db(ECHO_DB) * mid, size)
    ports = irfft(spectrum * np.exp(.5j * lead * sides), size)[:, :N]
    return ports * linear_from_db(LEFT_DB * sides) + linear_from_db(ECHO_SIDE_DB) * side * sides


def top_cut(x):
    """Nothing passes above the cut-off."""
    return signal.sosfilt(signal.butter(12, 16970, fs=SR, output="sos"), x)


def record(dry):
    """The phone cuts the deepest bass and the top, ducks the treble after loud bass, and rounds the peaks."""
    x = signal.sosfilt(signal.butter(4, 38, "high", fs=SR, output="sos"), dry)
    bass = signal.sosfilt(signal.butter(2, 700, fs=SR, output="sos"), x)
    hold = np.exp(-1 / (0.047 * SR))  # 47 ms memory
    loudness = np.sqrt(signal.lfilter([1 - hold], [1, -hold], bass.mean(0) ** 2))
    ducked = bass + (x - bass) / (1 + (loudness / 0.42) ** 2)
    rounded = np.tanh(ducked)
    mix = signal.sosfilt(signal.ellip(10, .2, 80, TOP_HZ, fs=SR, output="sos"), rounded)
    return top_cut(mix)


dry = scene()
out = record(dry)
output_pcm(out)
```